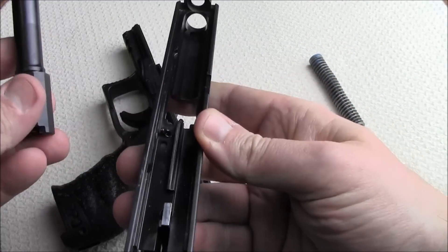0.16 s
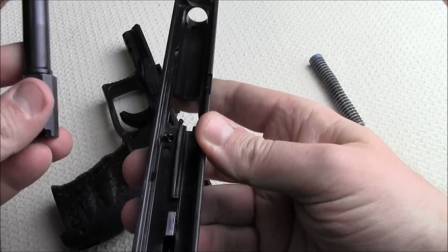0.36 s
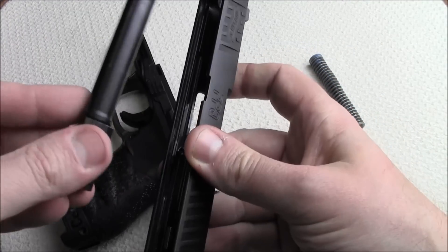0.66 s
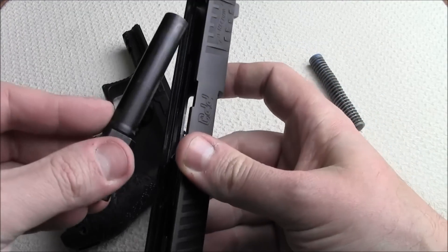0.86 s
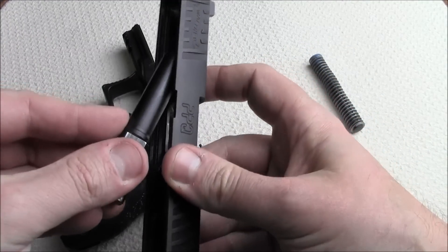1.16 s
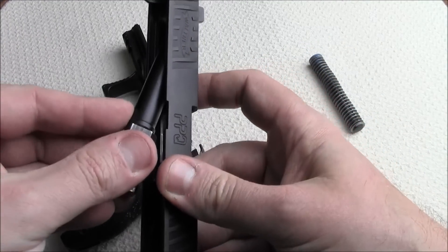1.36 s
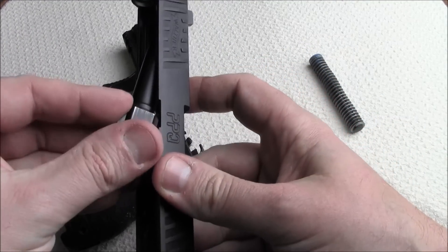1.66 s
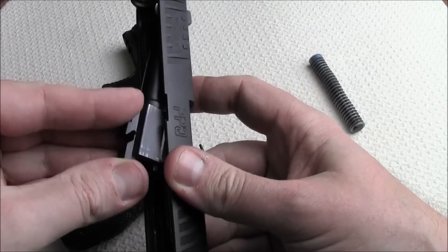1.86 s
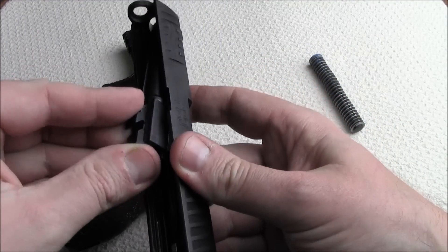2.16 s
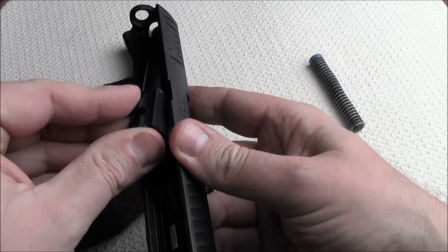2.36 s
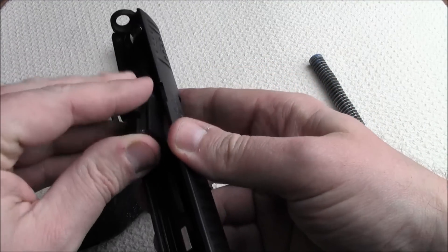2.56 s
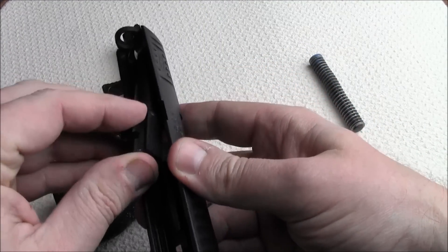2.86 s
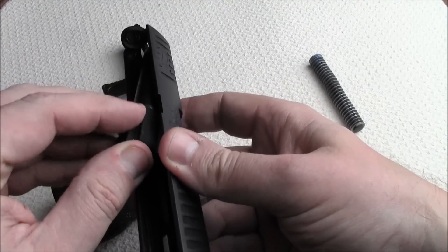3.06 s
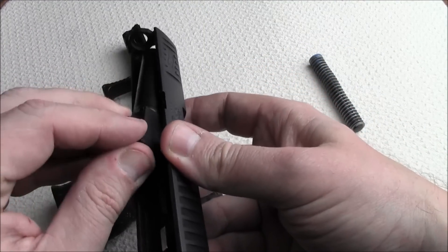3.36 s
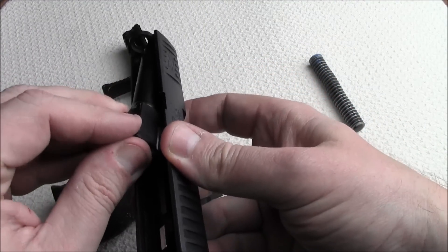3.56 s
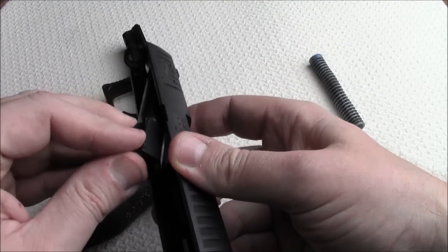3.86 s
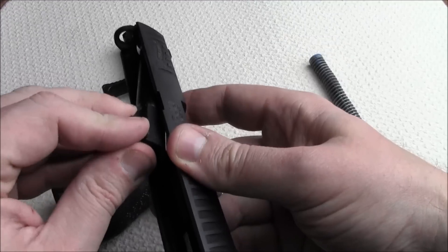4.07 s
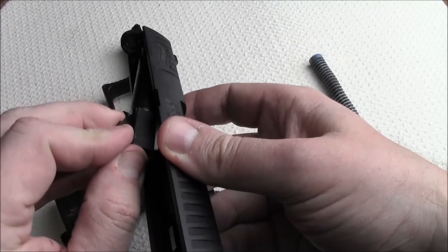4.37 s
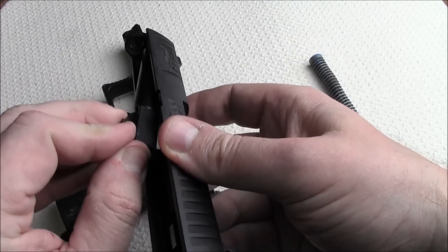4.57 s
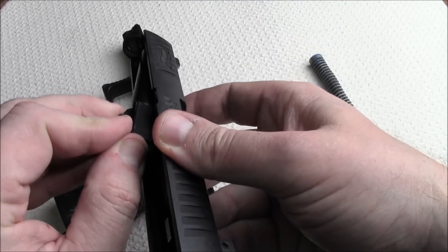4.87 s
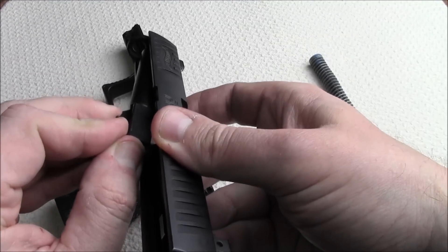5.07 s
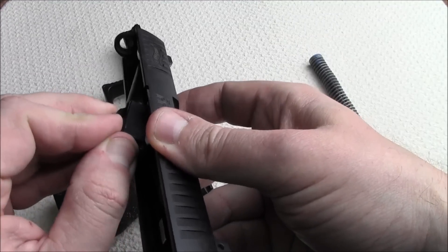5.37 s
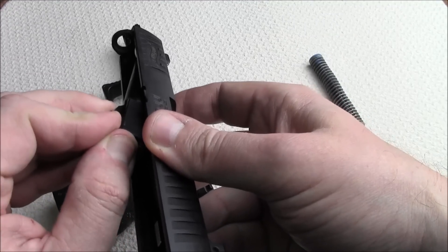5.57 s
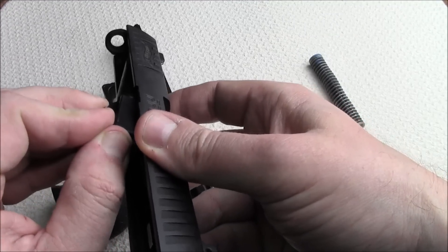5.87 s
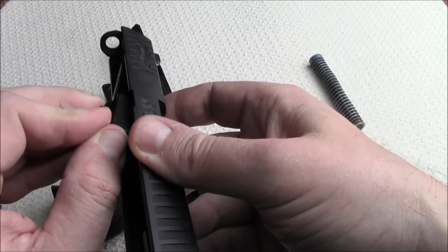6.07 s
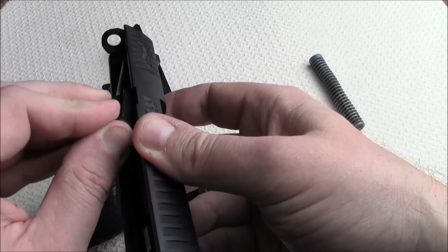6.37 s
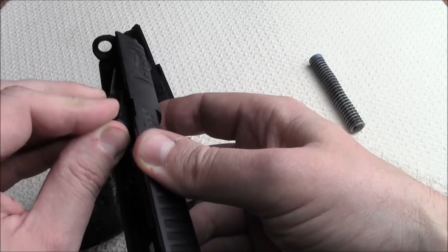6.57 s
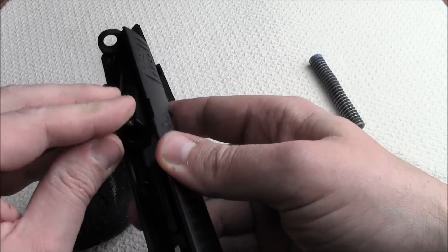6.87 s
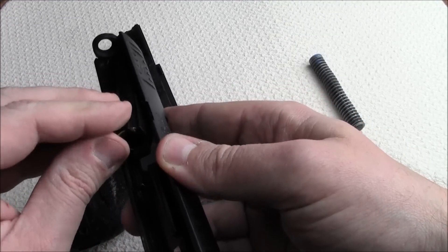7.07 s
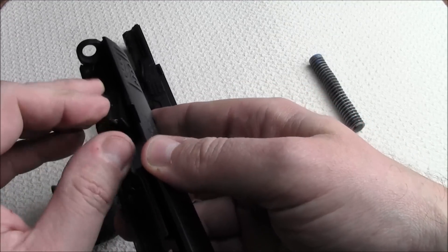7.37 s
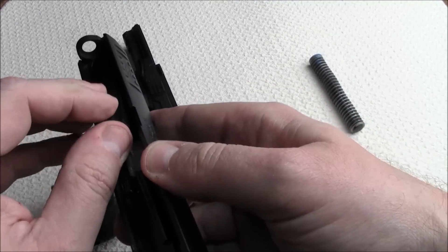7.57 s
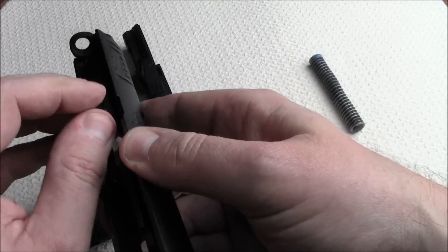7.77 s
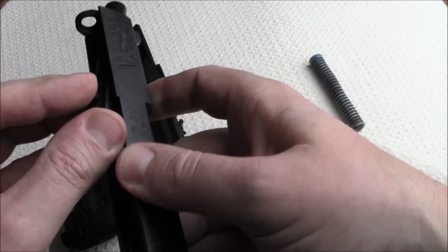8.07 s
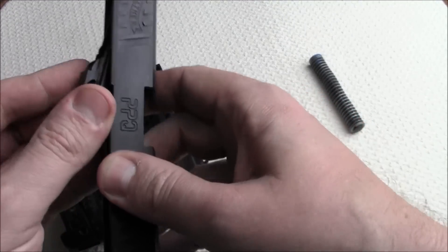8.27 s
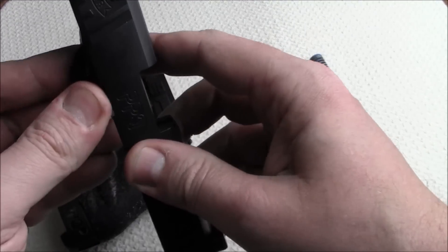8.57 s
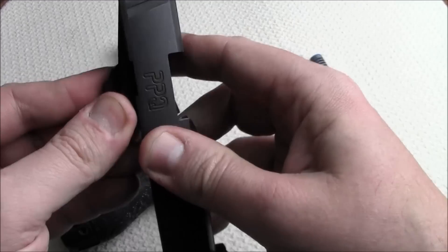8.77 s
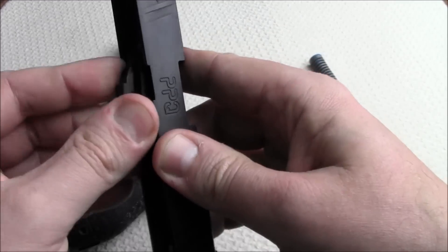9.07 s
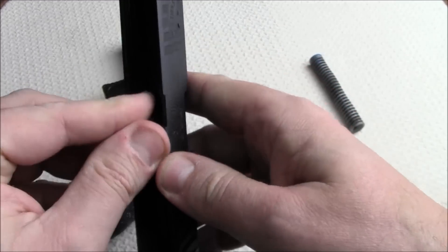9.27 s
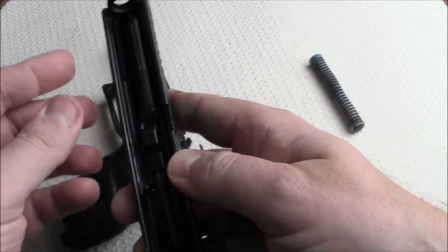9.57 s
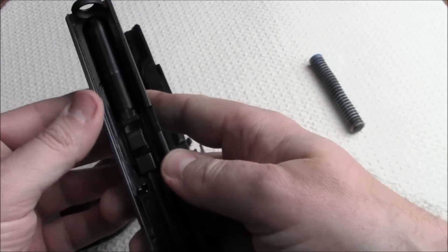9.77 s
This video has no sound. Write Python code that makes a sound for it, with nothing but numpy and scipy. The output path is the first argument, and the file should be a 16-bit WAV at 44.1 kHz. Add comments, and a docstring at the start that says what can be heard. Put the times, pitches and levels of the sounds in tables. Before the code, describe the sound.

Hands fit a steel barrel into a pistol slide, heard very close and dry. Faint room air and hiss come first, then a loud ringing knock, scraping and a run of uneven small clicks, some hard, some barely audible. A gritty slide of metal comes before a lull. Near the end, crisp, hard clicks rattle in quick succession and fall back to hush.

```python
"""A second of full room hush, then a hard click: a steel pistol barrel is worked into its slide by hand.
The place is a small, dead room; a pair of microphones sits on the table, close to the hands.
Clicks and scrapes are blows into damped steel modes; the barrel, held loosely, rings like a small bell.
The slide's long modes linger; close echoes, a faint room tail and shaped noise lie around and beneath.
A fast limiter catches the highest peaks."""
import sys
import numpy as np
from scipy import signal
from scipy.fft import rfft, irfft, next_fast_len
from scipy.io import wavfile
from scipy.ndimage import uniform_filter1d, minimum_filter1d

SR = 44100
rng = np.random.default_rng(int(sys.argv[2]) if len(sys.argv) > 2 else 0)


def unload_wav(signal):
    """Save mono or channel-first audio to the path in sys.argv[1] as 16-bit WAV at rate SR, clipped to [-1, 1]."""
    wavfile.write(
        sys.argv[1],
        SR,
        np.round(np.clip(np.atleast_2d(signal).T, -1, 1) * 32767).astype(np.int16),
    )


N = 437472

# Levels in the tables are relative: each source is trimmed further before it reaches the mix.
# steel meets steel: (time [s], body level [dB], hardness = snap over body [dB], pitch [Hz])
CLICKS = [(1.014, -6.5, -10.5, 3762), (1.123, -34.5, -18.5, 3780), (1.2501, -16, -8, 3736),
          (1.3777, -31.5, -35, 3700), (1.516, -27.5, -26.5, 3660), (1.5297, -12, -16.5, 3440),
          (1.774, -40, -33, 2915), (1.9233, -25, -23, 2815), (1.9973, -13.5, -20, 2413),
          (2.2087, -17, -22.5, 3680), (2.6247, -40.5, -38, 2350), (2.6676, -21.5, -24.5, 3620),
          (2.875, -24, -40, 3120), (2.895, -18, -34, 2440), (3.0319, -40, -51, 2350),
          (3.2701, -12.5, -25, 3807), (3.3528, -9.5, -25.5, 3510), (3.363, -17.5, -16, 3810),
          (3.49, -16, -9, 3790), (3.6906, -26.5, -18, 2710), (3.7617, -42, -34, 2390),
          (3.786, -33.5, -29.5, 2570), (3.829, -10.5, -10, 3847), (3.9306, -17.5, -28, 3260),
          (4.0317, -14, -24, 3760), (4.1538, -30, -29.5, 2300), (4.1831, -36, -34, 3300),
          (4.2603, -35.5, -48, 3740), (4.338, -12, -18, 3580), (4.382, -20, -23.5, 3170),
          (4.4229, -26, -13.5, 3800), (4.531, -38, -31, 3250), (4.652, -27, -27, 3720),
          (4.8065, -42.5, -49, 3090), (5.0772, -28.5, -14.5, 2570), (5.1874, -26, -27, 2400),
          (5.2013, -16.5, -19.5, 3116), (5.3957, -6.5, -20.5, 3830), (5.539, -18, -46, 2320),
          (5.565, -12.5, -27.5, 3770), (5.695, -42, -39, 3900), (5.769, -31, -45, 3750),
          (5.8869, -14.5, -30, 3000), (5.939, -20.5, -29, 3700), (6.0314, -13.5, -7, 2960),
          (6.3005, -37, -42, 2670), (6.5311, -16.5, -11.5, 2666), (7.0197, -16, -26.5, 2830),
          (7.214, -20, -23.5, 2520), (8.2473, -46, -2.5, 4150), (8.392, -46, -6, 4200),
          (8.419, -45, -12.5, 2930), (8.548, -40, -35, 3920), (8.735, -11, -9, 3913),
          (8.756, -15, 5.5, 3860), (8.8845, -36.5, -30, 4050), (8.9393, -20, -13, 2900),
          (8.97, -15, -10.5, 2714), (9.0006, -20, -9, 3900), (9.022, -29, -12.5, 4160),
          (9.0916, -15.5, -6, 2830), (9.11, -21.5, -18.5, 2890), (9.1628, -18.5, -9, 2700),
          (9.2231, -15.5, 2.5, 3776), (9.2347, -16, -2, 3770), (9.265, -26, -1, 3900),
          (9.5052, -29, -5.5, 3830)]
# steel slides on steel: (start [s], end [s], body level [dB], brightness over body [dB], pitch [Hz])
SCRAPES = [(1.127, 1.255, -38.5, 3, 3540), (1.237, 1.337, -25, -2, 3546),
           (1.335, 1.457, -34.5, -18.5, 3567), (1.418, 1.556, -24, -12, 3560),
           (1.817, 1.873, -47, -6.5, 3740), (1.893, 1.981, -42, -8.5, 2700),
           (2.18, 2.214, -41.5, -13, 2550), (3.219, 3.282, -33.5, -26, 3600), (3.266, 3.427, -30, -7, 3800),
           (3.427, 3.517, -26.5, -8.5, 3740), (3.622, 3.727, -42, -17, 2860), (3.802, 3.869, -32, 5, 3830),
           (4.2, 4.249, -46, -8, 3840), (4.314, 4.455, -29.5, -9, 3180), (4.568, 4.675, -44, -13.5, 2384),
           (4.973, 5.038, -40, -16, 3050), (5.098, 5.197, -45, -12.5, 2926),
           (5.348, 5.423, -33, -2.5, 3670), (5.505, 5.542, -30, -28, 2230),
           (5.819, 5.907, -43.5, -15.5, 3020), (5.889, 5.919, -27.5, -9, 3000),
           (5.928, 6.06, -38.5, -13.5, 3780), (6.028, 6.071, -23.5, -3.5, 3720),
           (6.13, 6.187, -31, -11, 3990), (6.446, 6.551, -22, 1.5, 2850), (6.999, 7.045, -23.5, -8, 2650),
           (7.049, 7.073, -27, -15, 2880), (7.143, 7.191, -27, -17, 2625), (7.219, 7.251, -30, -18, 2500),
           (7.265, 7.316, -18.5, -10.5, 2366), (8.725, 8.786, -17, 3, 3870), (8.932, 9.059, -30, -6, 2773),
           (9.205, 9.281, -28.5, 13.5, 3796)]
# the barrel's bending mode, pitched and damped by the grip:
# (time [s], pitch [Hz], level [dB], t60 of the first fall [s], rise time constant [s])
BARREL_RINGS = [(1.0137, 3793, 13.5, 0.081, 0.0013), (1.123, 3788, -13, 0.29, 0.005),
                (1.205, 3840, -13, 0.32, 0.029), (1.262, 3764, 7.5, 0.12, 0.022),
                (1.316, 3792, -2.5, 0.039, .002), (1.375, 3840, -17.5, 0.071, 0.0016),
                (1.436, 3810, -10, 0.11, 0.0094), (3.271, 3754, -15, 0.12, .002),
                (3.353, 3820, 3.5, 0.073, 0.012), (4.259, 3790, -41, 0.23, .003),
                (4.343, 3810, -16, 0.2, .001), (4.653, 3816, -35, 0.16, 0.0011),
                (5.078, 3793, -30.5, 0.45, 0.003), (5.202, 3793, -26.5, 0.23, .001),
                (5.4, 3790, -8, 0.28, 0.0015), (5.941, 3870, -25, 0.19, 0.0015),
                (6.032, 3845, -16.5, 0.09, .001), (6.165, 4160, -37, 0.094, .008),
                (8.775, 3887, -34.5, .3, 0.0025), (9.5055, 3805, -13, 0.038, 0.0015)]
# barrel and slide in the hands, before each contact detunes and damps them:
# (frequency [Hz], level [dB], undamped t60 [s])
STEEL_MODES = [(1364, -2.5, 0.027), (1665, -7, 0.025), (2403, -0.5, 0.041), (2609, -0.5, 0.047),
               (2879, 1.5, 0.04), (3048, 4.5, 0.054), (3070, 6.5, .03), (3445, 3.5, 0.025),
               (3876, 0.5, 0.038), (4187, -5, 0.022), (4490, -17.5, 0.096), (5427, -9, 0.05),
               (6294, -10.5, 0.027), (6510, -4, 0.018), (6783, 6.5, 0.023), (7170, -5, 0.09),
               (7370, -4, .04), (8086, -4, 0.028), (8487, -13.5, 0.069), (9100, -14.5, .03),
               (9640, -12, .035), (10010, -9.5, 0.039), (10460, -19, .03), (11706, -18, 0.049),
               (13700, -26.5, 0.037)]
# the slide's long modes: (frequency [Hz], level [dB], free t60 [s])
SLIDE_MODES = [(1345, -13, 0.48), (1710, -6, 0.33), (2480, -13.5, .25), (2800, -6.5, 0.37),
               (3660, -6, 0.61), (6580, 3, 0.28), (6500, 4, 0.21), (7360, -5, 0.296), (9750, -16, 0.76)]
# body, knock, clink and snap of a click: (low edge [Hz], high edge [Hz])
REGISTERS = [(1900, 5000), (300, 1900), (5000, 8800), (8800, 14500)]
# short, dull thumps under three of the clicks: (time [s], level [dB])
THUMPS = [(3.829, -19.5), (9.092, -23), (9.2363, -15)]
# decay of the small room: (frequency [Hz], t60 [s])
ROOM_DECAY = [(300, 0.17), (1700, 0.12), (3800, 0.16), (7000, 0.082), (14000, 0.081)]
# course of the background: (time [s], murky air level [dB], hiss level [dB])
HUSH_LEVELS = [(0, -47.5, -58), (.98, -49, -57.5), (1.1, -60, -68.5), (1.7, -58.5, -68.5),
               (2.401, -54, -65.5), (3.25, -54.5, -62), (3.901, -59.5, -63), (4.702, -54, -68.5),
               (5.3, -55.5, -62.5), (5.7, -58, -66), (6.3, -57, -65), (6.8, -51.5, -66),
               (7.701, -52.5, -60), (8.699, -53, -61.5), (9.35, -60.5, -55.5), (9.6, -58.5, -69.5),
               (9.92, -54.5, -64.5)]
# colour of the room air and hiss: (frequency [Hz], spectral level [dB])
AIR_COLOUR = [(15, -30), (25, 2.5), (43, -3.5), (64, -8.5), (153, 1), (185, -3), (285, -2.5), (591, -8),
              (714, -7.5), (863, -10.5), (2000, -12.5), (2760, -14.5), (4610, -15), (11900, -20.5),
              (16000, -22.5)]
# how alike the hush is at the two microphones: (frequency [Hz], left-right correlation [-1 to 1])
LIKENESS = [(60, 0.76), (180, 0.2), (550, -0.14), (1650, 0.77), (4970, 0.8), (15000, 0.28)]

# the click against which strength and hardness are judged
TYPICAL_DB, TYPICAL_HARDNESS_DB = -22, -20
# over the body: a harder contact clinks more, a stronger one carries relatively less dull knock (dB, dB per dB)
CLINK_DB, CLINK_PER_HARDNESS = -6, 0.3
KNOCK_DB, KNOCK_PER_STRENGTH = -20, -0.36
# slide shimmer after a typical click, and its growth (dB, dB per dB)
SHIMMER_DB, SHIMMER_PER_STRENGTH, SHIMMER_PER_HARDNESS = -55.5, 1.53, 0.45
SLIPS_PER_S, SLIP_SPREAD_DB, SCRAPE_KNOCK_DB = 5000, 4.5, -17.5
TOP_HZ = 15700  # nothing is heard above this


def amp(db):
    """Decibels to amplitude."""
    return 10 ** (np.asarray(db) / 20)


def unit(x):
    """Scale to an RMS of one."""
    return x / np.sqrt(np.mean(x ** 2) + 1e-20)


def along(points, hz):
    """Read (frequency, value) points on a log-frequency axis."""
    f, value = np.transpose(points)
    return np.interp(np.log(hz + 1), np.log(f + 1), value)


def filtered(x, response):
    """Multiply the spectrum of x by a response of frequency."""
    size = next_fast_len(N + SR // 2)
    spectrum = rfft(x, size) * response(np.fft.rfftfreq(size, 1 / SR))
    return irfft(spectrum, size)[..., :N]


def band(x, edges, order=4):
    """Causal band-pass."""
    return signal.sosfilt(signal.butter(order, edges, "band", fs=SR, output="sos"), x)


def add(track, s, sound):
    """Mix a sound in at time s."""
    part = track[max(round(s * SR), 0):][:len(sound)]
    part += sound[:len(part)]


def steel(pitch, focus_db, spread_db, damping, crack_db, crack_t60):
    """One answer per contact: each spot weights the modes anew, and the grip favours those near its pitch."""
    t = np.arange(SR // 10) / SR
    hz, db, t60 = np.transpose(STEEL_MODES)
    count, pitch = len(pitch), pitch[:, None]
    weight = rng.standard_normal((count, len(hz)))
    detune = 1 + 0.011 * rng.standard_normal((count, len(hz)))
    near = np.exp(-(np.log(hz / pitch) / 0.0594) ** 2)  # one at the pitch, falling within a semitone or two
    gains = amp(db + spread_db * weight + focus_db * near)
    tuned = hz * detune * (pitch / hz) ** near  # near modes are pulled to the pitch
    # a crack of noise at the moment of contact
    out = amp(crack_db - 60 * t / crack_t60) * rng.standard_normal((count, len(t)))
    for k in range(len(hz)):
        fall = amp(-60 * t * damping / t60[k])
        tone = np.sin(2 * np.pi * tuned[:, k, None] * t)
        out += (-1) ** k * gains[:, k, None] * fall * tone
    return out


def clicks():
    """Each contact chatters for a few milliseconds; its strength and hardness set how each register speaks."""
    times, body_db, hardness_db, pitch = np.transpose(CLICKS)
    knock_db = KNOCK_DB + KNOCK_PER_STRENGTH * (body_db - TYPICAL_DB)
    clink_db = CLINK_DB + CLINK_PER_HARDNESS * (hardness_db - TYPICAL_HARDNESS_DB)
    count = len(times)
    blow = steel(pitch, focus_db=9, spread_db=3.5, damping=1.34, crack_db=3.5, crack_t60=0.012)

    # the first touch, then up to seven weaker ones within 8 ms
    chatter = np.zeros((count, SR // 50))
    chatter[:, 0] = 1
    for row, lag in zip(chatter, rng.random((count, 7))):
        touch = np.clip((lag * 0.008 * SR).astype(int), 8, len(row) - 1)
        row[touch] = 0.28 * amp(-5 * lag)
    blow = signal.fftconvolve(blow, chatter, axes=1)

    voiced = np.zeros_like(blow)
    for edges, over_db in zip(REGISTERS, [0, knock_db, clink_db, hardness_db]):
        part = band(blow, edges)
        attack = np.sqrt(np.mean(part[:, :SR // 86] ** 2, axis=1))  # RMS of the first 12 ms
        voiced += part * (amp(body_db + over_db) / attack)[:, None]

    out = np.zeros(N)
    for s, sound, lead in zip(times, voiced, rng.random(count)):
        add(out, s, sound)
        add(out, s - 0.002 - 0.0052 * lead, amp(-34) * sound)  # a faint copy 2 to 7 ms ahead softens the onset
    return out


def scrapes():
    """Sliding edges catch and slip under growing pressure: a hail of tiny, uneven blows into the steel modes."""
    out = np.zeros(N)
    pitch = np.transpose(SCRAPES)[4]
    answers = steel(pitch, focus_db=10, spread_db=3, damping=1.6, crack_db=-3.5, crack_t60=0.01)
    for (start, end, db, bright_db, _), answer in zip(SCRAPES, answers):
        n = max(round((end - start) * SR), SR // 100)
        size = rng.standard_normal(n)
        slipping = rng.random(n) < SLIPS_PER_S / SR
        slips = slipping * np.sign(size) * amp(SLIP_SPREAD_DB * np.abs(size))
        pressure = signal.windows.tukey(n, 0.6) * amp(np.linspace(-3, 0, n))
        stroke = signal.fftconvolve(slips * pressure, answer)
        registers = [((400, 1900), db + SCRAPE_KNOCK_DB),
                     ((1900, 5000), db),
                     ((5000, 16000), db + bright_db - 1.5)]
        for edges, level_db in registers:
            part = band(stroke, edges)
            add(out, start, amp(level_db) * part / np.std(part[:n]))
    return out


def barrel():
    """The loose barrel sings on one high note that falls quickly and then lingers."""
    out, t = np.zeros(N), np.arange(SR // 4) / SR
    for s, hz, db, t60, rise in BARREL_RINGS:
        swell = 1 - np.exp(-t / max(rise, 1e-4))
        fall = amp(-60 * t / t60) + amp(-20 - 60 * t / (3 * t60))  # quick fall, weak slow tail
        grip = 1 / (1 + (t / 0.22) ** 8)  # the fingers close on it again
        buzz = np.cumsum(rng.standard_normal(len(t))) * 0.01  # light contact unsettles the phase
        add(out, s, amp(db) * swell * fall * grip * np.sin(2 * np.pi * hz * t + buzz))
    return out


def afterring(x):
    """Every contact also feeds resonators at the slide's long modes, which the hands hardly damp."""
    hz, db, t60 = np.transpose(SLIDE_MODES)
    widths = 1.9 * np.log(1000) / (np.pi * t60)  # Hz; 1.9 times the width of the free mode

    def response(f):
        total = 0
        for centre, width, level_db in zip(hz, widths, db):
            loss = 1j * f * width
            total = total + amp(level_db - 7.0) * loss / (centre ** 2 - f ** 2 + loss)
        return total

    return filtered(x, response)


def shimmer(count=14):
    """After a hard blow the slide keeps ringing faintly, and the fingers on it make each mode waver."""
    out, t = np.zeros(N), np.arange(SR // 2) / SR
    hz, level_db, t60 = np.transpose(SLIDE_MODES)[:, :, None]
    fade = amp(level_db - 60 * t / t60) * (1 - np.exp(-t / 0.002))
    times, body_db, hardness_db, _ = np.transpose(CLICKS)
    ring_db = (SHIMMER_DB + SHIMMER_PER_STRENGTH * (body_db - TYPICAL_DB)
               + SHIMMER_PER_HARDNESS * (hardness_db - TYPICAL_HARDNESS_DB))
    strongest = np.sort(np.argsort(-ring_db)[:count])
    for s, db in zip(times[strongest], ring_db[strongest]):
        drift = np.cumsum(rng.standard_normal((len(hz), len(t))), axis=1) * 0.08  # radians
        modes = fade * np.sin(2 * np.pi * hz * t + drift)
        add(out, s, amp(db) * modes.sum(axis=0))
    return out


def thumps():
    """A short, dull thump under a click: one push that swings back below zero and dies away."""
    out = np.zeros(N)
    u = np.arange(SR // 20) / SR / 0.00081  # time in units of 0.81 ms
    for s, db in THUMPS:
        add(out, s, amp(db - 3) * (1 - u) * np.exp(-u))
    return out


def nearby(x):
    """Table top and hands throw quick echoes, of opposite sign at the two microphones."""
    t = np.arange(SR // 60) / SR
    echoes = rng.standard_normal(len(t)) * amp(-60 * t / 0.03) * (t > 0.001)
    echoed = signal.fftconvolve(x, echoes / np.linalg.norm(echoes))[:N]
    side = band(echoed, (3500, 16000), order=1)
    return np.array([side, -side])


def room(x):
    """The small room answers 5 ms later with a faint noise tail, slightly different at each microphone."""
    hz, t, z = signal.stft(rng.standard_normal((2, SR // 2)), SR, nperseg=256)
    fall = amp(-60 * t / along(ROOM_DECAY, hz)[:, None])
    tail = signal.istft(z * fall, SR, nperseg=256)[1]
    tail = tail + 0.93 * tail[::-1]  # the two capsules sit close together
    delayed = np.pad(x, (SR // 200, 0))[None]
    return signal.fftconvolve(delayed, tail / np.linalg.norm(tail[0]), axes=1)[:, :N]


def hush():
    """Room air and hiss, shaped from noise: full at first, then sinking and swelling."""
    s, air_db, hiss_db = np.transpose(HUSH_LEVELS)

    def level(db):
        return amp(np.interp(np.arange(N) / SR, s, db))

    def mid_side(hz):
        """The share of mid against side sets the left-right correlation."""
        angle = np.arccos(np.clip(along(LIKENESS, hz), -1, 1)) / 2
        return amp(along(AIR_COLOUR, hz)) * np.array([np.cos(angle), np.sin(angle)])

    mid, side = filtered(rng.standard_normal((2, N)), mid_side)
    pair = np.array([mid + side, mid - side])
    air = filtered(pair, lambda hz: 1 / (1 + (hz / 2500) ** 2))
    hiss = pair - air
    return unit(air) * level(air_db + 2.5) + unit(hiss) * level(hiss_db + 5.0)


def scene():
    """The handled steel close by, its reflections, and the hush of the room beneath."""
    contacts = amp(-1.33) * clicks() + amp(-2.0) * scrapes()
    ringing = amp(0.5) * afterring(contacts) + amp(1.4) * barrel() + amp(-3.5) * shimmer()
    handling = contacts + ringing + amp(1.0) * thumps()
    return handling + amp(-21.0) * nearby(handling) + amp(-19) * room(handling) + hush()


def record(dry):
    """The microphones fade in the top octave, a fast limiter holds the peaks near full scale, the band is cut."""
    heard = signal.sosfilt(signal.butter(3, 13000, fs=SR, output="sos"), dry)
    needed = np.minimum(1, 1.024 / (np.abs(heard).max(axis=0) + 1e-9))
    gain = uniform_filter1d(minimum_filter1d(needed, size=45), size=45)  # 1 ms hold, then 1 ms smoothing
    return filtered(heard * gain, lambda hz: hz < TOP_HZ)


dry = scene()
out = record(dry)
unload_wav(out)
```